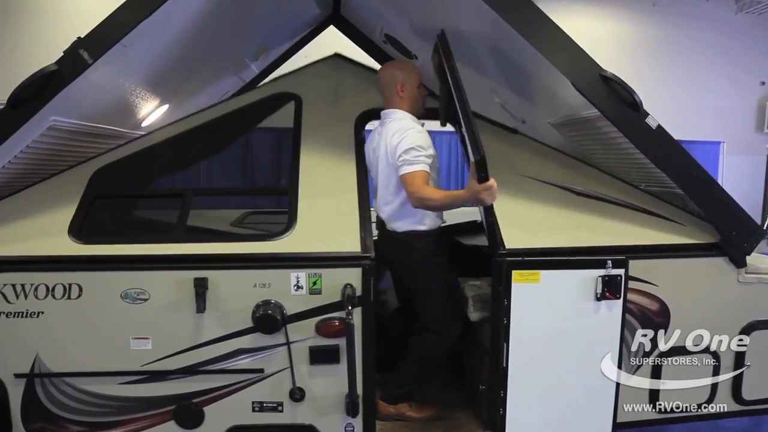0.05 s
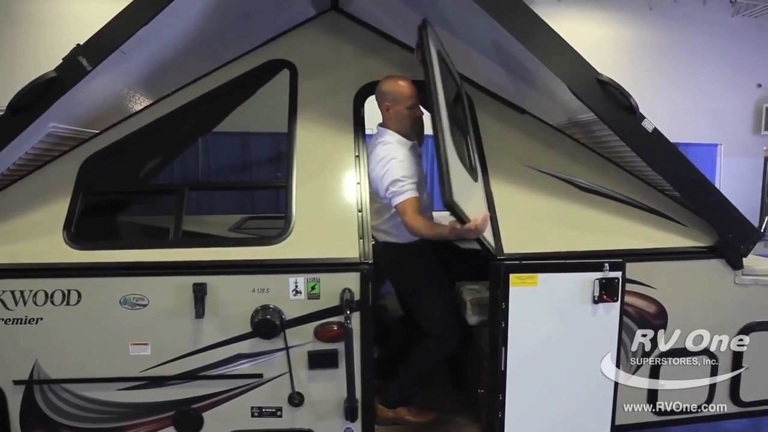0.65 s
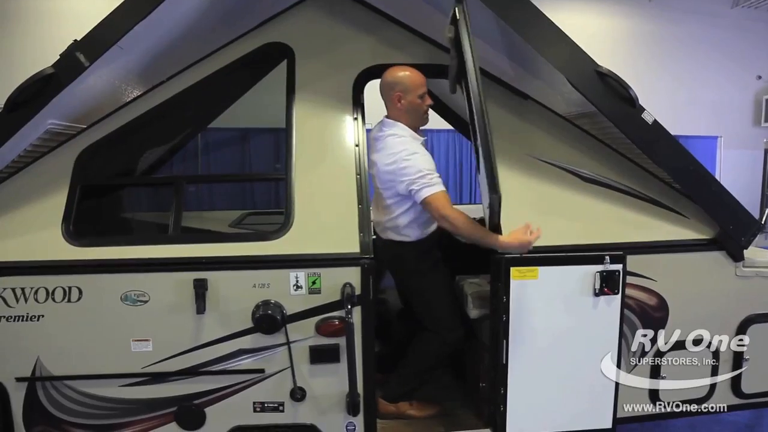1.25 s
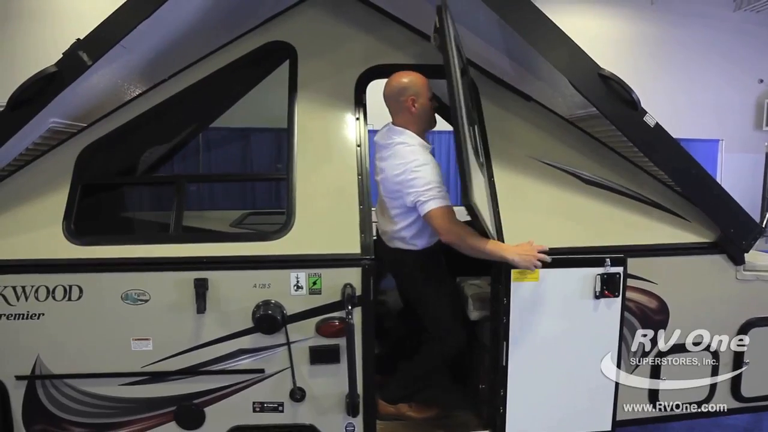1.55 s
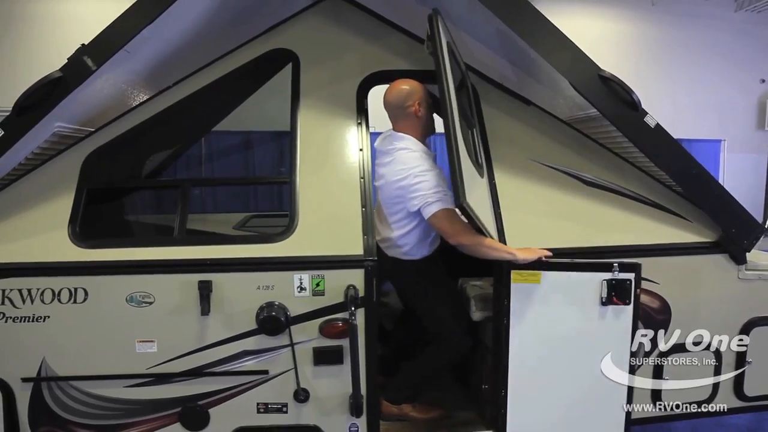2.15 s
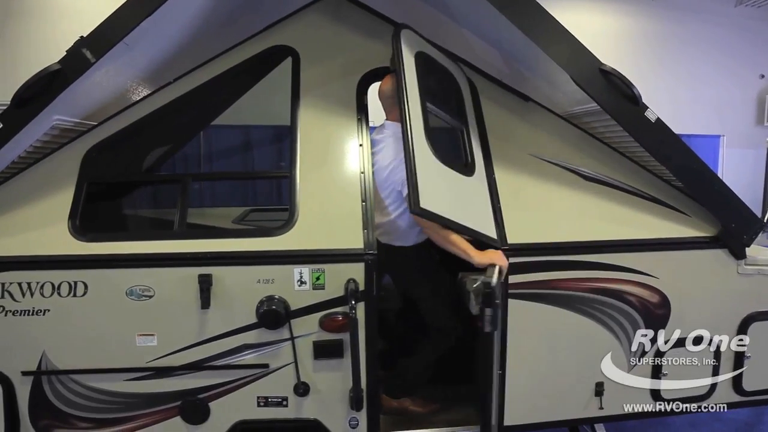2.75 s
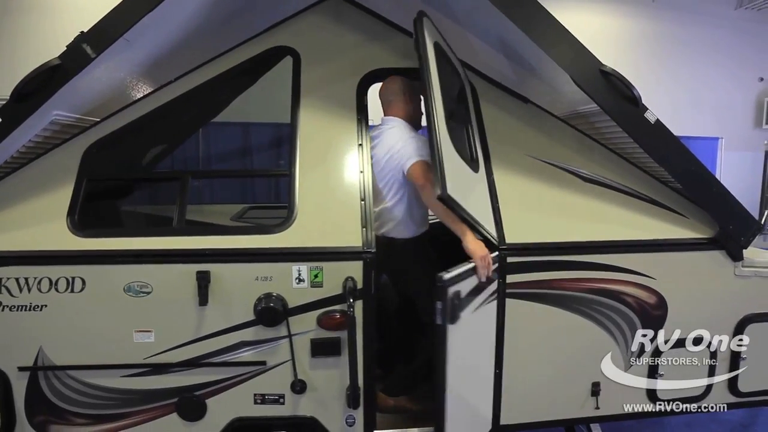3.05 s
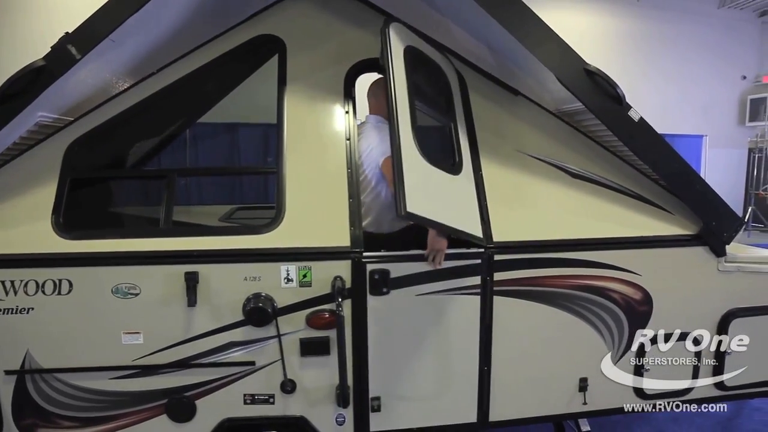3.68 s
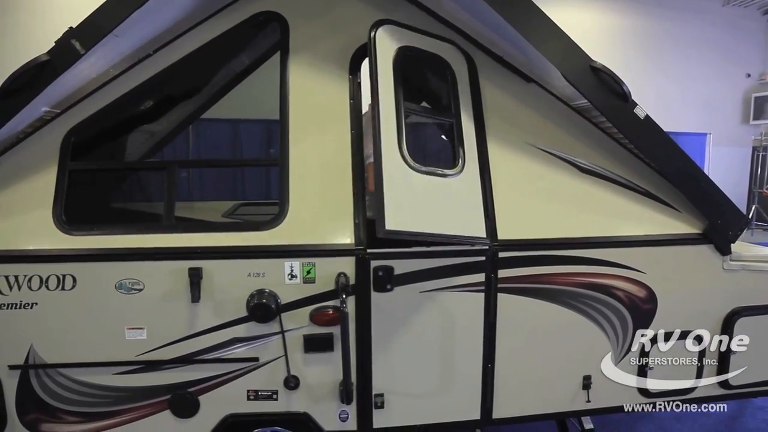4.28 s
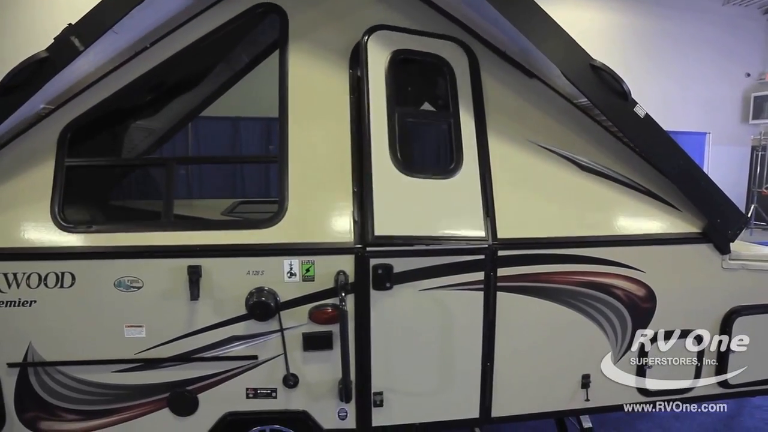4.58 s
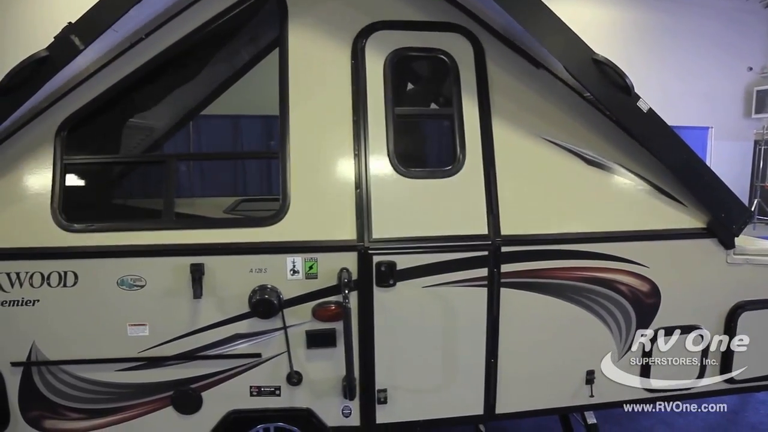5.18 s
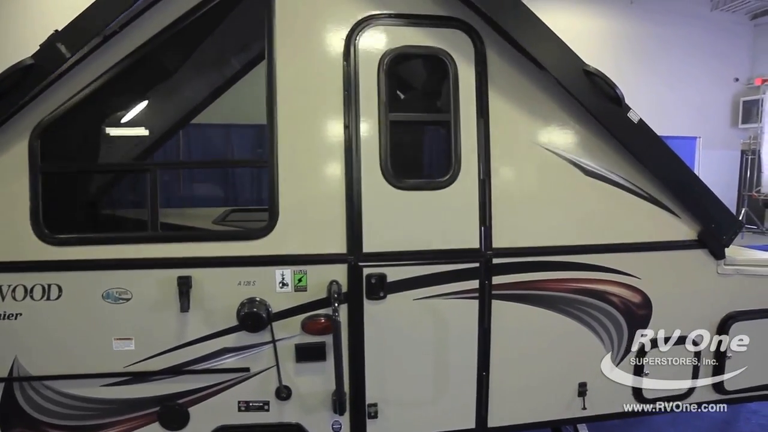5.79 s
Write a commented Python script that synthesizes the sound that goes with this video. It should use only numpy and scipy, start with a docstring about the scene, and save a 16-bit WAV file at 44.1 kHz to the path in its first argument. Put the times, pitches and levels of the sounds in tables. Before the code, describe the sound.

A trailer's split door knocks, creaks and groans, then slams with a rattling metal latch and bangs once more indoors.

```python
"""Split trailer door in a showroom

The upper leaf of a camping trailer's door swings back and knocks on its stop. The lower leaf creaks and
groans as its hinge sticks and slips, then slams, its steel latch rattling; the upper leaf bangs shut.
Each blow sets a hollow panel booming. Clothes rustle in between, over a bed of ventilation rumble."""
import sys
import numpy as np
from scipy import signal
from scipy.fft import rfft, irfft, next_fast_len
from scipy.io import wavfile
from scipy.ndimage import uniform_filter1d

SR = 44100
rng = np.random.default_rng(int(sys.argv[2]) if len(sys.argv) > 2 else 0)


def bounce(signal):
    """Save signal as a 16-bit WAV file at the path given by the first command-line argument."""
    frames = np.transpose(np.atleast_2d(signal))
    limited = np.clip(frames, -1, 1)
    pcm = np.round(limited * 32767).astype(np.int16)
    wavfile.write(sys.argv[1], SR, pcm)


N = 257103
TIME = np.arange(N) / SR
RING_TIME = np.arange(SR) / SR  # one second after a contact

# Tone of the ventilation. Each row: frequency in Hz, relative level in dB.
VENT_COLOUR = [(13, -39.5), (22, -17.5), (44, 5.5), (174, -6), (328, -12), (569, -21.5), (1860, -28.5),
               (2450, -32), (3150, -28.5), (3920, -36), (16000, -38.5)]
# The showroom's tail. Each row: frequency in Hz, t60 in seconds, relative level in dB.
SHOWROOM_TAIL = [(50, 1.2, -16), (145, 1.3, -11.5), (396, 0.64, -9), (1000, 0.91, -5.5), (2320, 0.53, 3),
                 (3130, 0.3, 6), (4170, 0.39, 4), (8000, 1, -2), (15000, .6, -5)]
# Tone of the cloth. Each row: frequency in Hz, relative level in dB.
CLOTH_COLOUR = [(120, 2), (300, 7), (1200, -6), (3000, -15), (7000, -22), (15000, -21)]
# Strokes of cloth and hand. Each row: middle in seconds, level in dB, half length in seconds.
CLOTH_STROKES = [(0.224, -65, 0.087), (.72, -69, 0.28), (0.873, -61, 0.098), (1.07, -66.5, 0.11),
                 (1.67, -56, 0.026), (2.727, -65.5, 0.3), (3.44, -66, .15), (4.388, -69, 0.17),
                 (4.806, -73, .2), (5.659, -67.5, 0.26)]
# Knocks of hand and loose fittings. Each row: start in seconds, level in dB, centre in Hz.
TAPS = [(0.057, -54.5, 240), (.542, -58.5, 840), (.8, -57.5, 1010), (0.907, -61.5, 1370),
        (1.1766, -55, 7740), (1.2032, -53, 5700), (1.2519, -50.5, 1460), (1.392, -54.5, 1400),
        (1.433, -52.5, 2040), (1.619, -57.5, 700), (3.377, -64, 3015), (3.852, -53, 1725),
        (4.0235, -58.5, 699), (4.916, -58, 1179), (5.628, -61, 1520)]
# Chirps of the dry hinge pin. Each row: middle in seconds, level in dB, pitch in Hz,
# glide to either side as a share of the pitch, half length in seconds.
PIN_SQUEAKS = [(1.08, -71.5, 4200, 0.025, 0.005), (2.597, -59, 15900, 0.0048, 0.027),
               (3.418, -56, 6640, 0.043, 0.0033)]
# Ticks in the hinge's tone: a lone one as the hand lands on the door, then a pull on the lower hinge. Each row:
# start in seconds, first tick's level in dB, length in seconds.
HINGE_TICKS = [(1.749, -64, .04), (1.997, -63, .26)]
# Ring of the hinge. Each row: frequency in Hz, level in dB, t60 in seconds.
HINGE_MODES = [(1660, 0.5, 0.048), (1957, -4, 0.076), (2850, -13, 0.073), (3086, 5, 0.039),
               (4460, -9.5, 0.043)]
# The lower leaf turning. Each row: time in seconds, groan level in dB, slips per second.
LOWER_SWING = [(2.5, -72, 205), (2.681, -53.5, 213), (2.74, -54.5, 173), (2.85, -42, 151),
               (2.949, -57, 147), (3.121, -67, 144)]
# Body of the groaning leaf. Each row: frequency in Hz, width in Hz, relative level in dB.
GROAN_RESONANCES = [(144.3, 3.4, 0), (226, 35, -13), (282.9, 61, -15), (362, 13, -16), (617, 120, -30.5)]
# Throws of the loose latch. Each row: start in seconds, level in dB, tilt in dB per octave,
# delay until it springs back in seconds.
LATCH_THROWS = [(2.8714, -51.5, -2.5, 0.011), (3.0625, -63, -2.5, 0.014), (3.2292, -63, -2, 0.022),
                (3.5131, -33.5, 1, 0.0045), (3.5985, -32.5, -1.5, .006), (3.6239, -30.5, 5.5, .002),
                (3.716, -42, 3, .0106), (3.908, -39.5, -.5, 0.016), (4.111, -46, -2, 0.02),
                (4.335, -68, 0.5, 0.0045)]
# Tone of the latch's click. Each row: frequency in Hz, level in dB.
CLICK_COLOUR = [(300, -14), (900, -8), (1500, -8.5), (3000, 0), (5000, -5.5), (9000, -6.5), (13000, -7.5),
                (16000, -15.5)]
# Clustered ring of the steel handle. Each row: frequency in Hz, level in dB, free t60 in seconds.
HANDLE_MODES = [(1406, -2.5, 0.063), (1853, -3.5, 0.081), (2936, -1.5, 0.12), (2890, -4, 0.13),
                (3078, 0, 0.069), (4410, -10, 0.029), (6340, -5.5, 0.053), (7490, -5.5, 0.11),
                (8750, -6, 0.075), (10600, -9.5, 0.11), (13310, -9.5, 0.089), (14600, -5, .09)]
# A leaf lands on its stop or frame. Each row: start in seconds, then the levels in dB of
# low thud, mid knock, high clack and far edge.
BLOWS = [(1.1236, -30, -23, -36.5, -38), (3.521, -33.5, -22.5, -30, -21),
         (3.528, -30.5, -23.5, -24.5, -21.5), (4.9446, -32, -26.5, -26, -36)]
# Decay of the panel's dense modes. Each row: frequency in Hz, base t60 in seconds.
PANEL_DECAY = [(50, 0.65), (150, 0.4), (400, .2), (1000, 0.1), (3000, 0.06), (12000, 0.1)]
# Tone of the far edge landing. Each row: frequency in Hz, level in dB.
EDGE_COLOUR = [(28, -12.5), (42, -7.5), (130, -7), (290, -6), (550, -4.5), (1000, -0.5), (3100, 3),
               (5500, -7), (11000, -5), (15500, -14.5)]
# A leaf stopped dead heaves. Each row: start in seconds, level in dB, pitch in Hz, t60 in seconds.
HEAVES = [(3.5177, -12, 193, 0.018), (3.5309, -8, 244.3, 0.042), (4.9446, -5.5, 206.7, 0.028)]
# Strongest modes of each leaf, open or shut. Each row: frequency in Hz, level in dB, t60 in seconds.
UPPER_OPEN = [(264, -8, 0.34), (307, -5, 0.28), (436, -16, 0.38), (468, -13, 0.26), (635, -20, 0.35),
              (721, 0, 0.13), (748, -11, 0.2), (781, -17, 0.28)]
LOWER_SHUT = [(75.4, -7, 0.51), (140, 0, 0.27), (205, -13, 0.51), (301, -6, 0.21), (361, -11, 0.19),
              (393, -16, 0.24), (554, -20, 0.4), (824, -28, 0.45), (937, -23, 0.33)]
UPPER_SHUT = [(194, -7, 0.31), (264, -6, 0.24), (339, -6, 0.16), (576, -12, 0.21), (689, 0, 0.11),
              (1017, -10, 0.12), (1340, -16, 0.13)]
# The boom after each bang. Each row: start in seconds, level in dB, pitch blur in Hz, the leaf's modes.
BOOMS = [(1.1235, -24, 47, UPPER_OPEN), (3.534, -17, 17, LOWER_SHUT), (4.945, -21.5, 32.4, UPPER_SHUT)]

TOP_HZ = 15900  # upper edge of the treble


def amp(db):
    """Decibels to gain."""
    return 10 ** (np.asarray(db) / 20)


def unit(x):
    """The signal at rms 1."""
    return x / np.sqrt(np.mean(x ** 2) + 1e-20)


def along(points, hz):
    """A curve of (Hz, value) points, read on a log frequency axis."""
    freqs, values = np.transpose(points)
    return np.interp(np.log(hz + 1), np.log(freqs + 1), values)


def filtered(x, response):
    """EQ a signal with a gain given as a function of frequency."""
    size = next_fast_len(len(x) + SR // 4)
    return irfft(rfft(x, size) * response(np.fft.rfftfreq(size, 1 / SR)), size)[:len(x)]


def noise(colour):
    """Noise of rms 1, shaped by (Hz, dB) points."""
    return unit(filtered(rng.standard_normal(N), lambda hz: amp(along(colour, hz))))


def wander(smooth_samples, size=N):
    """A random wobble of rms 1; more smoothing makes it slower."""
    return unit(uniform_filter1d(rng.standard_normal(size), size=smooth_samples))


def add(track, start_s, sound):
    """Mix a sound into the track."""
    part = track[round(start_s * SR):][:len(sound)]
    part += sound[:len(part)]


def burst(level_db, t60, size=SR):
    """Countless struck modes: half-octave noise bands, each with its own level and decay."""
    t, octave = RING_TIME[:size], np.log2(np.fft.rfftfreq(size, 1 / SR) + 1)
    white, out = rfft(rng.standard_normal(size)), np.zeros(size)
    bite = 1 + 0.65 * np.exp(-t / 0.00017)  # strongest during the contact
    for hz in np.geomspace(30, 15360, 19):
        band = irfft(white * np.sqrt(np.clip(1 - 2 * abs(octave - np.log2(hz)), 0, 1)), size)
        attack = np.minimum(2 * hz * t, 1)
        envelope = bite * attack * np.exp(-np.minimum(np.log(1000) * t / t60(hz), 20))
        makeup = np.sqrt(np.sum(envelope ** 2) / np.sum((band * envelope) ** 2))
        out += amp(level_db(hz)) * band * envelope * makeup
    return out


def ring(modes, blur_hz, size=SR, detune=0):
    """Damped modes, a little different at each strike; loose parts blur and can shift their pitch."""
    t, out = RING_TIME[:size], np.zeros(size)
    for hz, db, t60 in modes:
        wobble_hz = blur_hz * wander(90, size)
        phase = 2 * np.pi * np.cumsum(hz * (1 + detune * rng.normal()) + wobble_hz) / SR
        out += amp(db + rng.normal()) * np.exp(-np.log(1000) * t / t60) * np.sin(phase)
    return out


def ventilation():
    """Moving air lays a steady low rumble under the scene."""
    return amp(-62.5) * noise(VENT_COLOUR)


def showroom(send):
    """The room answers with a diffuse tail that hangs longest in the bass."""
    bands = np.array(SHOWROOM_TAIL)
    decay, colour = bands[:, [0, 1]], bands[:, [0, 2]]
    tail = burst(lambda hz: along(colour, hz), lambda hz: along(decay, hz))
    tail *= 1 - np.exp(-RING_TIME / 0.0028)
    return signal.fftconvolve(send, tail / np.linalg.norm(tail))[:N]


def movement():
    """How strongly the clothes move: one soft swell for each stroke."""
    swells = [amp(db) / (1 + ((TIME - middle) / half_s) ** 2) ** 2 for middle, db, half_s in CLOTH_STROKES]
    return np.linalg.norm(swells, axis=0)


def rustle():
    """Cloth brushes past in soft, grainy swells."""
    grain = amp(2.2 * wander(400))
    return movement() * grain * noise(CLOTH_COLOUR)


def tap(centre_hz):
    """A small dead contact with one broad hump of tone; lower ones start softer and last longer."""
    t60 = .085 * (1000 / centre_hz) ** 0.29
    knock = burst(lambda hz: -8.2 * np.hypot(np.log2(hz / centre_hz), .5), lambda hz: t60, size=9000)
    return knock * (1 - np.exp(-RING_TIME[:len(knock)] * 90 / t60))


def handling(touches_per_s=6, touch_db=1, touch_hz=1100):
    """Hand and fittings knock on the door; faint random touches ride on the movement of the clothes."""
    knocks, touches = np.zeros(N), np.zeros(N)
    for start, db, centre_hz in TAPS:
        add(knocks, start, amp(db) * tap(centre_hz))
    for when, pitch in rng.random((round(touches_per_s * N / SR), 2)):
        add(touches, when * N / SR, tap(touch_hz * 2 ** (4 * (pitch - .5))))
    return knocks + amp(touch_db) * movement() * touches


def pin_squeak(middle, db, pitch_hz, glide, half_s):
    """The dry hinge pin gives a falling chirp; the lower chirps carry a weak octave."""
    t = (TIME - middle) / half_s
    hz = pitch_hz * (1 - glide * np.tanh(t) + .012 * wander(30))
    phase = 2 * np.pi * np.cumsum(hz) / SR
    octave = amp(-15) * (2 * pitch_hz < TOP_HZ) * np.sin(2 * phase)
    return amp(db) * np.exp(-np.minimum(t ** 2, 20)) * (np.sin(phase) + octave)


def hinge_creak(gap_s=.0408, loss_db=2.1, stick_s=.029):
    """Under a pull the hinge sticks, then ticks in ever weaker slips that settle to a steady pace."""
    out = np.zeros(N)
    for start, db, length in HINGE_TICKS:
        for slip in range(int(length / gap_s) or 1):
            held_s = stick_s * (1 - .31 ** slip)  # sticking stretches the first gaps
            tick = ring(HINGE_MODES, blur_hz=122, size=9000)
            add(out, start + slip * gap_s + held_s, amp(db - slip * loss_db) * tick)
    return out


def leaf_body(hz):
    """The leaf's response to the hinge: resonances of alternating sign, dulled above 900 Hz."""
    peaks = sum((-1) ** k * amp(db) * 1j * hz * width / (centre ** 2 - hz ** 2 + 1j * hz * width)
                for k, (centre, width, db) in enumerate(GROAN_RESONANCES))
    return peaks / (1 + (hz / 900) ** 2)


def hinge_groan():
    """In the swing the slips of the hinge run together and the leaf groans."""
    times, groan_db, rate = np.transpose(LOWER_SWING)
    slip_hz = np.interp(TIME, times, rate) * np.exp(.12 * wander(400))
    slips = np.diff(np.floor(np.cumsum(slip_hz) / SR), prepend=0)
    groan = filtered(slips * amp(3 * rng.standard_normal(N)), leaf_body)
    # even it out, so the pull of the hand alone sets the level
    groan /= np.sqrt(abs(uniform_filter1d(groan ** 2, size=3000)) + 1e-20)
    return groan * amp(np.interp(TIME, times, groan_db, left=-120, right=-120))


def latch(spring_db=-47, handle_db=-0.5):
    """Steel strikes steel, out and back: each time a short click and the rattling ring of the handle."""
    out = np.zeros(N)
    damped = [(hz, db, .6 * t60) for hz, db, t60 in HANDLE_MODES]  # the spring presses on the handle
    for start, throw_db, tilt_db, return_s in LATCH_THROWS:
        return_db = spring_db + 0.69 * (throw_db - spring_db)  # between the spring's click and the throw
        for at, db in (start, throw_db), (start + return_s, return_db):
            click = burst(lambda hz: along(CLICK_COLOUR, hz) - 4, lambda hz: .035, size=9000)
            handle = ring(damped, blur_hz=130, size=9000, detune=.03)
            contact = click + amp(handle_db) * handle
            add(out, at, amp(db) * filtered(contact, lambda hz: amp(tilt_db * np.log2((hz + 300) / 3500))))
    return out


def door_bangs(edge_lag_s=.012, spread_s=0.00026):
    """Each blow shakes the hollow panel, near edge then far edge; the leaf heaves and booms."""
    out = np.zeros(N)
    for start, thud_db, knock_db, clack_db, edge_db in BLOWS:
        crack_db = clack_db - 7.5
        colour = [(28, thud_db - 6), (42, thud_db), (165, thud_db), (260, knock_db), (720, knock_db - 0.5),
                  (1350, clack_db), (3100, clack_db),
                  (5500, crack_db), (11000, crack_db), (15500, crack_db - 4.5)]
        near_edge = burst(lambda hz: along(colour, hz) - 3.5, lambda hz: .58 * along(PANEL_DECAY, hz))
        # the leaf flexes: its far edge lands later and rings longer
        far_edge = burst(lambda hz: edge_db + along(EDGE_COLOUR, hz) - 5,
                         lambda hz: .92 * along(PANEL_DECAY, hz))
        add(out, start, near_edge)
        add(out, start + edge_lag_s, far_edge)
    for start, db, hz, t60 in HEAVES:
        add(out, start, -ring([(hz, db, t60)], blur_hz=60))
    bloom = 1 - np.exp(-RING_TIME / spread_s)  # the modes take a moment to span the leaf
    for start, db, blur_hz, modes in BOOMS:
        add(out, start, amp(db) * bloom * ring(modes, blur_hz))
    return out


def scene():
    """Door and clothes up close, a touch of showroom behind them, ventilation underneath; mono."""
    close = door_bangs() + latch() + hinge_creak() + hinge_groan()
    close += sum(pin_squeak(*row) for row in PIN_SQUEAKS) + rustle() + handling()
    # a closed door sends less sound round the room: the send drops just before the last bang
    send_db = np.where(TIME > 4.7, -29, -22)
    return (close + showroom(amp(send_db) * close) + ventilation())[None]


def record(dry):
    """A steep low-pass trims the very top of the treble."""
    return np.array([filtered(x, lambda hz: 1 / (1 + (hz / TOP_HZ) ** 160)) for x in dry])


dry = scene()
out = record(dry)
bounce(out)
```